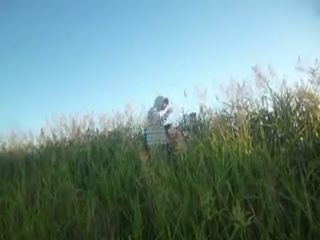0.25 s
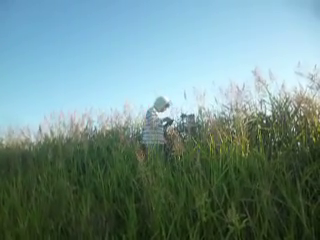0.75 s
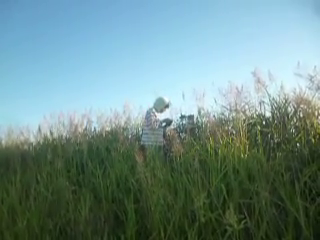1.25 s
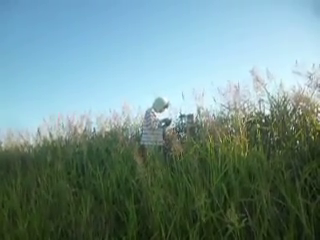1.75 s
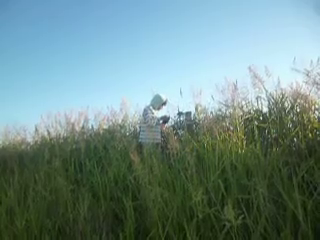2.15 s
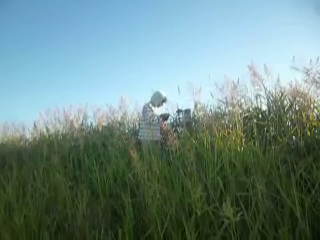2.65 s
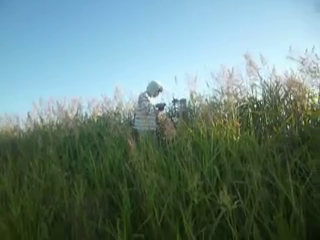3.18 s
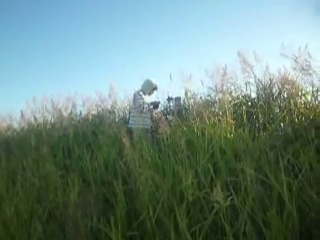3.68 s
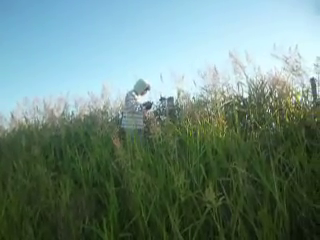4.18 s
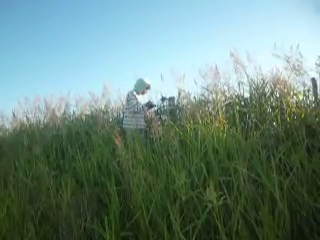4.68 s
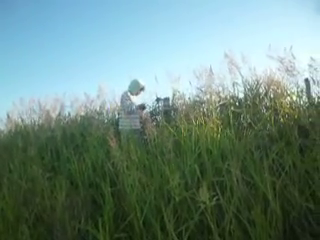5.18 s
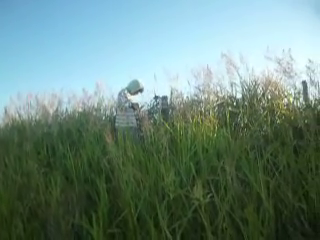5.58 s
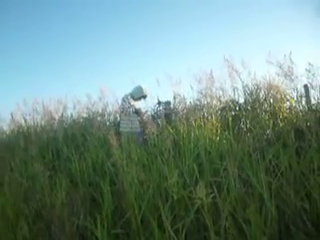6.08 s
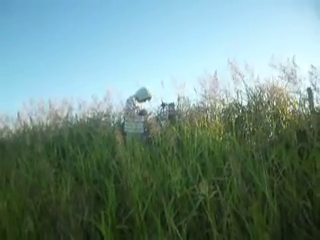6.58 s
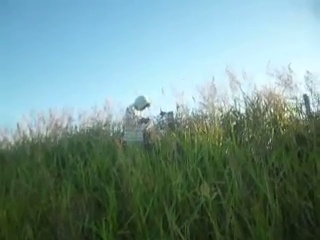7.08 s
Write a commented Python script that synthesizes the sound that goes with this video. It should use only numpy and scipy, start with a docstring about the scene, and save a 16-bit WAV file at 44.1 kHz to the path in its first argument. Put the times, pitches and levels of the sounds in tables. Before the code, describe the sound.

In an open grassy field, a small bird opens with a quick clipped phrase and buzz, then pauses while distant birds chirp faintly. It returns with sliding high whistles, a buzz and a quick trill of falling chirps, rests again, then ends in a jumble of slurs and buzzes. Grass hisses softly, stems tick, and wind thumps low on the microphone.

```python
"""In a field of tall grass, small birds sing: slurred whistles, trills of falling chirps and short buzzes.
Each whistle is a sine gliding in pitch; a buzz sweeps its pitch over and over.
The grass scatters the song back as short dying tails of noise. Stems tick as tiny cracks of noise.
The field hisses and rustles as coloured noise, and wind thumps and rumbles on the microphone."""
import sys
import numpy as np
from scipy import signal
from scipy.fft import rfft, irfft, next_fast_len
from scipy.io import wavfile
from scipy.ndimage import uniform_filter1d, map_coordinates

SR = 44100
rng = np.random.default_rng(int(sys.argv[2]) if len(sys.argv) > 2 else 0)


def persist_wave(psi):
    """Save psi, clipped to +-1, as 16-bit WAV."""
    counts = np.round(np.clip(psi, -1, 1) * 32767).astype(np.int16)
    wavfile.write(sys.argv[1], SR, np.atleast_2d(counts).T)


N = 323694  # length [samples]

# whistled notes whose pitch bends smoothly through three values: (start [s], length [s], first pitch [Hz],
# middle pitch [Hz], last pitch [Hz], loudest level [dB], place of the loudest point [0-1], middle if left out)
NOTES = [ (.053, 0.0054, 4700, 6400, 6800, -48.5, .7), (0.068, .006, 6330, 6540, 6700, -52),
         (0.076, .003, 4600, 5200, 5800, -47), (0.077, 0.01, 6560, 6200, 5810, -45),
         (0.126, .009, 5120, 4820, 4550, -46), (.132, .017, 5530, 4940, 4340, -41.5),
         (.15, 0.024, 4270, 3760, 3470, -46, 0.28), (0.148, 0.082, 7000, 6800, 6280, -58, .35),
         (1.579, 0.028, 5050, 5900, 6570, -62, 0.94), (2.442, 0.032, 4700, 4564, 4670, -43.5),
         (1.685, .12, 4050, 3730, 3440, -71, .35), (1.974, .066, 5830, 5270, 4830, -70),
         (2.472, 0.044, 4720, 4620, 4650, -51, 0.04), (2.508, 0.23, 2250, 2310, 2420, -59),
         (2.729, 0.07, 2070, 2070, 2060, -60.5, .1), (2.809, 0.13, 4504, 4470, 4430, -57.5),
         (2.855, 0.075, 6320, 5430, 4480, -60.5), (2.903, 0.059, 3340, 3395, 3340, -52, 0.3),
         (3.04, 0.043, 6600, 6780, 6550, -52, 0.6), (3.553, .05, 6700, 7400, 6230, -64.5),
         (1.604, .018, 3650, 3900, 4150, -65), (1.658, .055, 4830, 4720, 4500, -68, .35),
         (2.29, .08, 5600, 5150, 4750, -68, .35), (2.443, .014, 3950, 3780, 3650, -59),
         (4.191, .04, 4980, 3920, 3260, -58), (4.228, 0.086, 3700, 3590, 3460, -65, .4),
         (4.27, .022, 4620, 4100, 3660, -62, 0.7), (4.455, 0.12, 4310, 4200, 4200, -66, .45),
         (4.55, .065, 4640, 4600, 4640, -69), (4.795, .095, 3700, 3930, 3600, -66),
         (4.713, .04, 5400, 4300, 4000, -60, .25), (5.466, 0.13, 1756, 1730, 1720, -63, 0.2),
         (5.388, .036, 4000, 3350, 2900, -64), (5.5, 0.15, 4480, 3720, 3450, -68),
         (5.787, 0.058, 5140, 4980, 4640, -52), (5.82, 0.03, 2480, 3200, 4100, -66),
         (5.835, .012, 6340, 7200, 8800, -61), (6.085, 0.032, 8700, 8820, 8800, -52),
         (5.915, 0.068, 4600, 4560, 4535, -47.5, 0.88), (6.35, .17, 4280, 3850, 3450, -66, .4),
         (6.108, .015, 5360, 5000, 4670, -60), (6.208, 0.022, 1345, 1400, 1360, -58, .9),
         (6.283, 0.067, 1880, 2070, 2000, -61.5), (6.358, .11, 6300, 5340, 5033, -41.5, 0.67),
         (6.625, .095, 5050, 5750, 5200, -65.5, .4), (6.736, 0.031, 3400, 3330, 3400, -49.5, 0),
         (6.78, 0.065, 2950, 2895, 2920, -64), (6.804, 0.018, 5700, 5130, 4550, -41),
         (6.824, 0.02, 4250, 3940, 3540, -47), (6.877, 0.0052, 8500, 6770, 5130, -50),
         (6.88, 0.018, 4150, 4150, 4050, -63), (6.938, 0.013, 4050, 3760, 3500, -43.5, 0.32),
         (6.959, 0.022, 3450, 3280, 3050, -47, 0), (7.021, 0.16, 5110, 5070, 5120, -58),
         (7.045, .007, 6830, 5200, 4230, -53), (7.053, 0.014, 4050, 3810, 3580, -46),
         (7.104, 0.01, 5330, 4780, 4180, -44.5, 0.05), (7.116, .015, 3840, 3660, 3500, -48, 0.1),
         (7.168, 0.028, 5600, 4220, 3520, -47, 0.29), (7.197, .012, 3020, 3080, 3120, -55),
         (7.229, 0.029, 5570, 4340, 3280, -49.5, 0.35), (7.256, 0.01, 3250, 3430, 3600, -50.5, .7)]
# how far a note would swell up and fade if either took the whole note; roundness of that curve
RISE_DB, FALL_DB, ROUND = 34.5, 18, 1.8
# chips that draw closer together, then end in an even quick run:
# (start [s], loudest level [dB], length [s])
CHIPS = [(5.588, -59, 0.014), (5.763, -58.5, 0.019), (5.908, -56, 0.021), (6.033, -58, 0.024),
         (6.135, -57.5, .016), (6.208, -58.5, .014),
         (6.262, -57, .008)] + [(6.302 + 0.031 * k, -60, .007) for k in range(6)]
CHIP_HZ, CHIP_PEAK = (4060, 3840, 3360), .24  # first, middle, last pitch; place of the loudest point [0-1]
# short low pips that sag a little: (start [s], middle pitch [Hz], loudest level [dB])
PIPS = [(0, 3130, -55.5), (3.703, 3300, -59), (3.755, 3330, -64), (3.806, 3170, -60), (3.91, 3400, -61),
        (3.982, 3170, -60), (4.074, 3120, -60), (4.285, 2980, -65), (4.388, 1880, -60), (7.012, 3240, -57),
        (7.076, 3150, -56), (7.274, 3050, -59)]
PIP_S, PIP_SAG_HZ = .024, 90  # length, fall over each half
# longer slurs with turns of their own, each a list of (time [s], pitch [Hz], level [dB])
SLURS = [
    [(2.49, 6280, -56.5), (2.52, 5880, -42), (2.56, 5320, -35.5), (2.6, 4790, -42), (2.65, 4370, -39.5),
     (2.71, 3910, -39.5), (2.78, 3530, -41), (2.856, 3060, -48), (2.868, 3500, -52)],
    [(2.08, 4720, -64), (2.115, 4573, -41), (2.17, 4529, -35.5), (2.232, 4493, -37.5)],
    [(5.262, 2020, -64), (5.29, 2120, -62), (5.36, 1986, -59.5), (5.458, 1973, -59)],
    [(3.22, 6520, -53), (3.26, 6340, -57), (3.33, 5050, -64), (3.38, 4200, -54), (3.45, 3810, -57),
     (3.53, 3270, -71)],
    [(4.07, 1954, -69), (4.09, 2190, -63), (4.14, 2063, -60.5), (4.385, 2230, -54)],
    [(4.875, 6330, -70), (4.92, 5900, -69), (4.97, 4840, -57), (5.02, 4130, -65.5), (5.1, 3660, -71),
     (5.185, 3280, -63)],
    [(6.085, 7160, -57), (6.105, 7240, -55), (6.14, 6560, -59.5), (6.18, 6170, -45), (6.23, 5400, -45.5),
     (6.27, 4920, -41), (6.295, 4790, -43)],
    [(6.56, 4400, -61), (6.575, 4250, -48), (6.595, 3840, -44.5), (6.612, 3880, -53), (6.628, 4130, -55),
     (6.646, 4250, -63), (6.665, 4200, -50.5), (6.682, 3870, -47.5)],
]
# buzzes: (start [s], end [s], first centre pitch [Hz], last centre pitch [Hz],
# sweep to either side of the centre [Hz, + rising, - falling], sweeps a second [Hz], level [dB],
# share of the sweep rate lost by the end [0-1], none if left out)
BUZZES = [(0.083, 0.134, 6250, 5800, 750, 208, -42.5), (3.08, 3.239, 5600, 5450, 900, 210, -48.5),
          (3.216, 3.494, 5860, 5600, 751, 200, -59.5), (4.141, 4.196, 6220, 5450, -500, 201, -59.5),
          (4.44, 4.5, 6000, 5700, 600, 90, -66), (6.348, 6.374, 6170, 6250, 402, 173, -51.5),
          (6.514, 6.562, 5760, 5700, 1150, 159, -45.5, 0.3), (6.632, 6.664, 4050, 4150, -300, 168, -53),
          (6.728, 6.739, 3720, 3580, -500, 200, -52), (6.757, 6.807, 7160, 5900, -1000, 164.6, -49, 0.08),
          (6.914, 6.941, 4470, 4330, -700, 137, -51), (7.206, 7.225, 2970, 3170, 495, 151, -55)]
SWEEP_SHARE = .77  # part of each turn taken by the slow sweep
UNEVEN = .07  # wander of the sweep rate by the end, as a share
# the near trill, one row a chirp: (time [s], level [dB])
TRILL = [(2.9558, -35.5), (3.0082, -34.5), (3.0646, -34), (3.1197, -36), (3.189, -36.5), (3.2553, -36),
         (3.32, -37.5), (3.3843, -38), (3.4478, -36.5), (3.5117, -37.5), (3.576, -37), (3.6441, -37.5),
         (3.7114, -38.5), (3.7744, -39), (3.8497, -39.5)]
# glide of a near chirp: (time after its start [s], pitch [Hz], relative level [dB])
CHIRP = [(.003, 6410, -22), (.007, 5820, -8.5), (.016, 5234, 0.5), (.0195, 4790, -7.5), (.024, 4480, 0),
         (.0272, 4210, -7), (.0293, 4150, 0.5), (.0315, 3975, -5), (.034, 3900, -1.5), (.046, 3600, -14)]
TRIM, TRIM_WITHIN_S = .45, .3  # share of its end stretches that a chirp loses; how soon in the trill
# glides of birds further off, all as (time after the start [s], pitch [Hz], relative level [dB])
FAR_CHIRP = [(0, 5780, -3), (.011, 4850, -5), (.018, 4000, -4), (.029, 3700, -3)]
STEEP_CHIRP = [(0, 5790, -8.5), (.008, 4945, 0), (.016, 4200, -4.5), (.025, 3850, -7.5)]
THIN_CHIRP = [(0, 5770, -3.5), (.013, 4800, -4)]
SHORT_CHIRP = [(0, 5010, -5), (.014, 4050, -1), (.026, 3820, -2)]
# even runs of those chirps: (glide, first time [s], last time [s], time between [s],
# first level [dB], last level [dB])
RUNS = [(FAR_CHIRP, 0, .362, .0602, -58, -65), (FAR_CHIRP, .025, .324, .0594, -57.5, -61),
        (SHORT_CHIRP, 3.934, 4.127, .0644, -58.5, -59), (THIN_CHIRP, 4.382, 4.657, .046, -64, -66),
        (STEEP_CHIRP, 5.257, 6.075, .0586, -58.5, -59.5)]
SCATTER_DB, SCATTER_S = 1.5, .0015  # typical chance shift of level and time for each call of a run
# call of a distant low bird, an arch and a drop: (time after the start [s], pitch [Hz], relative level [dB])
LOW_PAIR = [(0, 2170, -6), (.035, 2310, -1.5), (.068, 2110, -9), (.086, 2130, -45), (.104, 2215, 0),
            (.145, 1900, -9)]
# when that bird calls: (time [s], level [dB])
LOW_CALLS = [(.345, -68), (.6, -65.5), (.86, -61.5), (1.13, -64), (1.41, -69), (1.69, -66)]
CHORUS_PER_S, CHORUS_TOP_DB = 7, -69  # stray chirps of birds at the edge of hearing
# grass stems ticking: (time [s], starting level before colouring [dB])
TICKS = [(0.536, -43.5), (0.563, -43), (0.865, -49), (4.6896, -47), (4.9788, -46.5), (6.07, -50.5)]
# treble balance of the microphone for birds and ticks: (frequency [Hz], level [dB])
MIC_TREBLE = [(6000, 1.5), (8000, 0.5), (8900, -25)]
# wind pushes on the diaphragm: (time [s], size [dB], quickness [Hz])
THUMPS = [(1.567, -36, 110), (1.727, -38, 110), (1.9554, -21.5, 134), (1.972, -33.5, 51),
          (1.99, -23.5, 124), (2.0249, -32, 88.5), (2.058, -33, 75), (2.118, -32, 88), (2.205, -32, 94),
          (2.268, -31, 85), (4.2584, -35, 104), (4.3027, -30.5, 88), (4.3353, -33.5, 107),
          (4.4386, -32.5, 79), (5.743, -31, 131), (5.7833, -31.5, 94), (5.974, -31.5, 117),
          (5.997, -32, 82.6), (6.185, -24.5, 160), (6.199, -27, 99), (6.294, -32.5, 54.5),
          (6.4974, -30, 107), (6.8945, -36, 120), (6.965, -34, 86), (7.1713, -31, 98)]
# buffeting of the microphone by wind: (time [s], level [dB])
BUFFET = [(0, -61.5), (1.5, -60.5), (2.1, -48), (2.5, -61.5), (2.75, -49.5), (3.2, -62), (4.15, -57),
          (4.33, -41.5), (4.55, -55.5), (5.301, -60), (5.6, -44), (5.9, -53), (6.2, -50.5), (7.34, -53.5)]
# tone of the buffeting: (frequency [Hz], relative level per Hz [dB])
RUMBLE_TONE = [(15, -16), (45, 5), (95, 6), (180, -11), (350, -54)]
# tone of the field's hiss: (frequency [Hz], relative level per Hz [dB])
HISS_TONE = [(20, -61), (60, 1.5), (600, -3), (1200, -9), (2500, -15), (5000, -19), (7000, -22.5),
             (8200, -31), (8900, -57)]
# rustle of blades close by: (time [s], level before its flicker [dB])
RUSTLE = [(0, -70), (.9, -73.5), (1.3, -76), (7.34, -68)]
TOP_HZ, OFFSET = 8900, .013  # top of the recorded band; constant shift of the wave [full scale = 1]


def birds():
    """Whistles and buzzes; trills are kept apart, as they come from deeper in the grass."""
    song, trills, fade = np.zeros(N), np.zeros(N), .003
    notes = [note(*row) for row in NOTES]
    chips = [note(s, length, *CHIP_HZ, db, CHIP_PEAK) for s, db, length in CHIPS]
    pips = [note(s, PIP_S, hz + PIP_SAG_HZ, hz, hz - PIP_SAG_HZ, db, CHIP_PEAK) for s, hz, db in PIPS]
    for rows in notes + chips + pips + SLURS:
        add(song, rows[0][0] - fade, whistle(rows, flutter_db=.58, fade=fade))
    for row in BUZZES:
        add(song, row[0], buzz(*row))
    for glide, s, db in calls():
        add(trills, s + glide[0][0] - fade, amp(db) * whistle(glide, flutter_db=.5, fade=fade))
    return song, trills


def note(start, length, first_hz, middle_hz, last_hz, db, peak=.5):
    """Glide of a simple note: the pitch follows a parabola, the level swells to its peak and falls again."""
    u = np.linspace(0, 1, num=25)
    bend = np.polyfit([0, .5, 1], [first_hz, middle_hz, last_hz], deg=2)
    hz = np.polyval(bend, u)
    below_peak_db = np.where(u < peak, RISE_DB, FALL_DB) * abs(u - peak) ** ROUND
    return np.transpose([start + length * u, hz, db - below_peak_db])


def whistle(rows, flutter_db, fade):
    """A sine glides through (time [s], pitch [Hz], level [dB]) points, corners rounded, level fluttering."""
    s, hz, db = np.transpose(rows)
    t = np.arange(s[0] - fade, s[-1] + fade, 1 / SR)
    pitch = uniform_filter1d(np.interp(t, s, hz), size=120)
    edge = np.clip(np.minimum(t - t[0], t[-1] - t) / (2 * fade), 0, 1)
    level = amp(np.interp(t, s, db) + flutter_db * wobble(90, size=len(t)))
    # a sine peaks at the square root of 2 times its average (RMS) level
    return np.sqrt(2) * edge * level * np.sin(2 * np.pi * np.cumsum(pitch) / SR)


def buzz(start, end, first_hz, last_hz, sweep_hz, rate, db, slowing=0):
    """The pitch sweeps slowly and swings back fast, fading between turns; falling ones swing in silence."""
    size = round((end - start) * SR)
    wander = UNEVEN * wobble(40, size=size) * np.linspace(0, 1, size)
    pace = np.linspace(1, 1 - slowing, size) + wander
    turn = np.cumsum(rate * pace / SR) % 1
    zigzag = np.interp(turn, [0, SWEEP_SHARE, 1], [-1, 1, -1])
    rough_zigzag = zigzag + .0484 * wobble(500, size=size)
    pitch = np.linspace(first_hz, last_hz, size) + sweep_hz * rough_zigzag
    voiced_share = 1 if sweep_hz > 0 else SWEEP_SHARE
    voiced = np.minimum(turn / voiced_share, 1)
    level = abs(np.sin(np.pi * voiced)) ** .61 * amp(db + 1.078 * wobble(350, size=size))
    edge = signal.windows.tukey(size, .4)
    return np.sqrt(2) * edge * level * np.sin(2 * np.pi * np.cumsum(pitch) / SR)


def calls():
    """Lists the glide, time [s] and level [dB] of every trill chirp, low call, run call and stray chirp."""
    out = []
    for s, db in TRILL:
        share = TRIM * np.tanh((s - TRILL[0][0]) / TRIM_WITHIN_S)
        out.append((trimmed(CHIRP, share), s, db))
    out += [(LOW_PAIR, s, db) for s, db in LOW_CALLS]
    for glide, first, last, gap, first_db, last_db in RUNS:
        times = np.linspace(first, last, round((last - first) / gap) + 1)
        chance = rng.standard_normal((len(times), 2))
        levels = np.linspace(first_db, last_db, len(times)) + SCATTER_DB * chance[:, 0]
        times = times + SCATTER_S * chance[:, 1]
        out += [(glide, s, db) for s, db in zip(times, levels)]
    for when, quieter, slower in rng.random((round(CHORUS_PER_S * N / SR), 3)):
        # slower stray chirps are also lower
        glide = SHORT_CHIRP * np.array([1 + slower, 1.2 - slower / 2, 1])
        out.append((glide, when * N / SR, CHORUS_TOP_DB - 6 * quieter))
    return out


def trimmed(glide, share):
    """Shortens a chirp by pulling both ends of its glide in along it, in time and pitch."""
    rows = np.array(glide)
    rows[[0, -1], :2] += share * (rows[[1, -2], :2] - rows[[0, -1], :2])
    return rows


def scatter(x, t60, db):
    """Stems and ground scatter the song into a noise tail that falls 60 dB in t60 seconds."""
    out, step, t = np.zeros(N), SR // 4, np.arange(SR // 2) / SR
    for i in range(0, N, step):  # a new tail every quarter second
        tail = rng.standard_normal(len(t)) * amp(-60 * t / t60) * (1 - np.exp(-t / .0013))
        add(out, i / SR, signal.fftconvolve(x[i:i + step], tail / np.linalg.norm(tail)))
    return amp(db) * out


def ticks():
    """Each stem tick is a crack of noise that dies away within milliseconds."""
    out, t = np.zeros(N), np.arange(SR // 50) / SR
    for s, db in TICKS:
        add(out, s, amp(db - 60 * t / .017) * rng.standard_normal(len(t)))
    return filtered(out, [(600, -3), (2500, 6), (4000, 6), (8000, -3.5)])


def wind():
    """Wind pushes the diaphragm in single dips with a rebound, over lumpy buffeting of low noise."""
    out, t = np.zeros(N), np.arange(-SR // 20, SR // 20) / SR
    for s, db, hz in THUMPS:
        bump = np.exp(-(2 * hz * t) ** 2)
        add(out, s + t[0], -amp(db) * bump * np.cos(2 * np.pi * hz * t + .73))
    level = amp(np.interp(np.arange(N) / SR, *np.transpose(BUFFET)))
    lumps = amp(4.6 * wobble(14))
    return out + level * unit(lumps * filtered(rng.standard_normal(N), RUMBLE_TONE))


def field():
    """Grass and far air hiss as noise that breathes a little; blades close by add a brighter rustle."""
    hiss_level = amp(-54 + .36 * wobble(1) + .83 * wobble(7))
    hiss = hiss_level * unit(filtered(rng.standard_normal(N), HISS_TONE))
    rustle_db = np.interp(np.arange(N) / SR, *np.transpose(RUSTLE)) + 3 * wobble(25)
    blades = filtered(rng.standard_normal(N), [(500, -2.5), (7500, -6.5), (8900, -31)])
    return hiss + amp(rustle_db) * unit(blades)


def amp(db):
    """Turns decibels into a plain multiplier."""
    return 10 ** (np.asarray(db) / 20)


def unit(x):
    """Scales a sound to an average (RMS) level of 1."""
    return x / np.sqrt(np.mean(x ** 2) + 1e-20)


def along(points, hz):
    """Reads values between (frequency [Hz], value) points on a log axis, as the ear spaces pitch."""
    f, v = np.transpose(points)
    return np.interp(np.log(hz + 1), np.log(f + 1), v)


def wobble(rate, size=N):
    """A smooth random curve through rate random values a second."""
    knots = rng.standard_normal(int(size * rate / SR) + 4)
    return map_coordinates(knots, [np.arange(size) * rate / SR])


def filtered(x, points):
    """Colours a sound by raising or lowering its frequencies to (frequency [Hz], level [dB]) points."""
    m = next_fast_len(N + 8192)
    gain = amp(along(points, np.fft.rfftfreq(m, 1 / SR)))
    return irfft(rfft(x, m) * gain, m)[..., :N]


def add(track, s, sound):
    """Mixes a sound into the track at time s [s]."""
    part = track[max(round(s * SR), 0):][:len(sound)]
    part += sound[:len(part)]


def scene():
    """Adds the birds, their scattered tails and the ticks to the wind and the field."""
    song, trills = birds()
    short_tail = scatter(song + 1.1 * trills, t60=.15, db=-11)
    long_tail = scatter(song + trills, t60=.47, db=-22.5)
    # thin stems return the high notes best
    echoes = filtered(short_tail + long_tail, [(2200, -7), (3500, .5), (6000, 3.5)])
    near_and_far = filtered(song + trills + echoes + ticks(), MIC_TREBLE)
    return (near_and_far + wind() + field())[None]


def record(dry):
    """A steep band limit cuts the highest treble, and the converter adds a constant offset."""
    return filtered(dry, [(TOP_HZ, 0), (TOP_HZ + 60, -90)]) + OFFSET


dry = scene()
out = record(dry)
persist_wave(out)
```